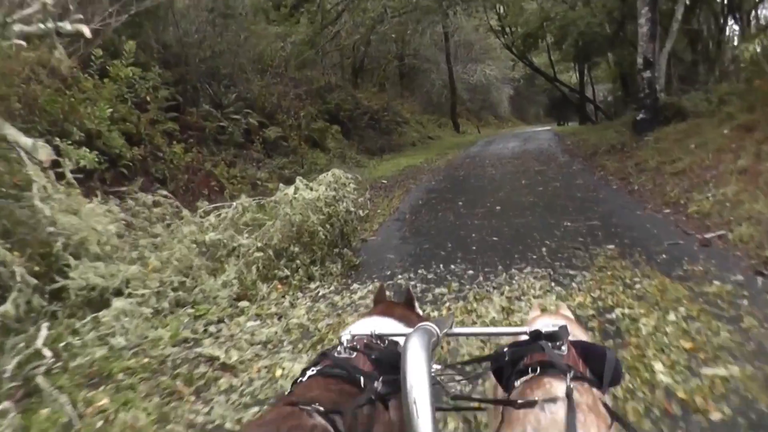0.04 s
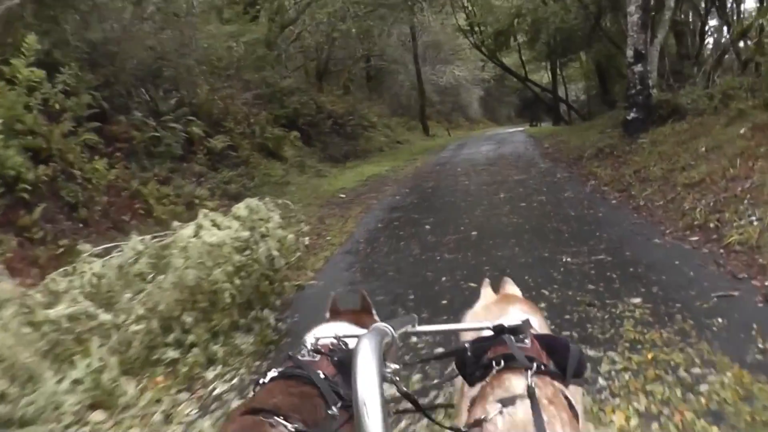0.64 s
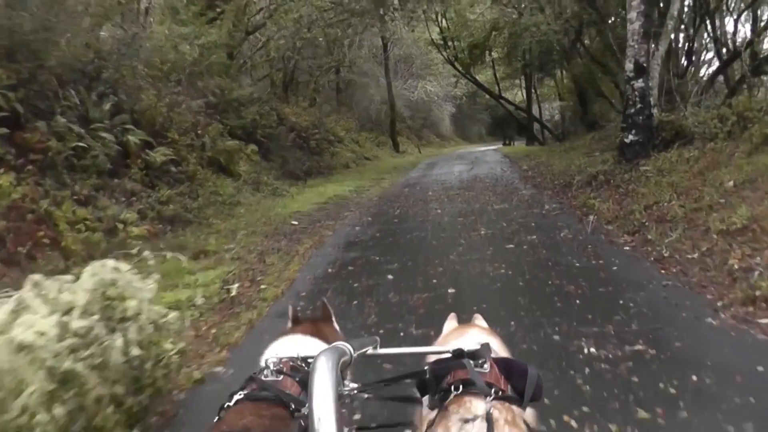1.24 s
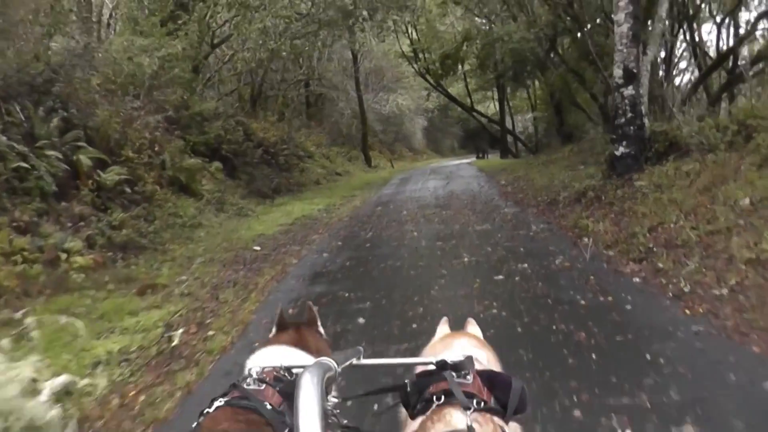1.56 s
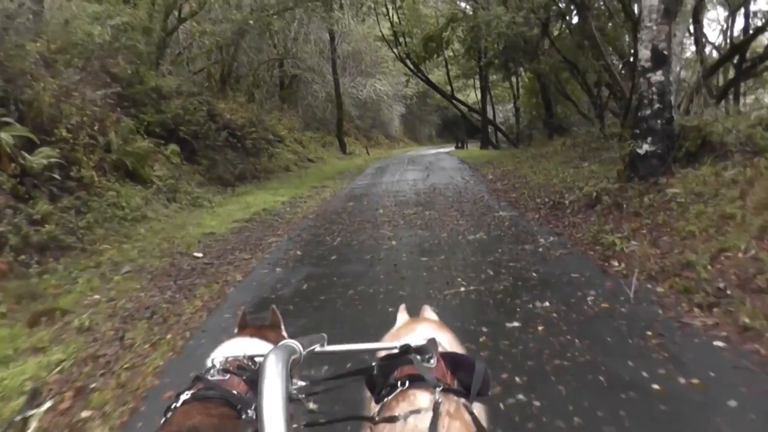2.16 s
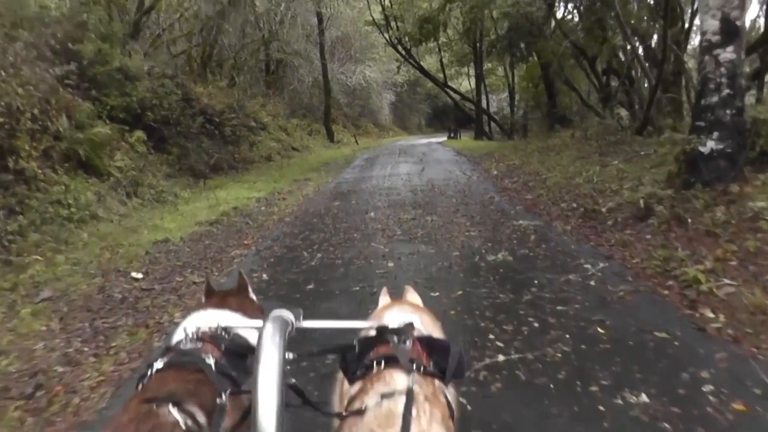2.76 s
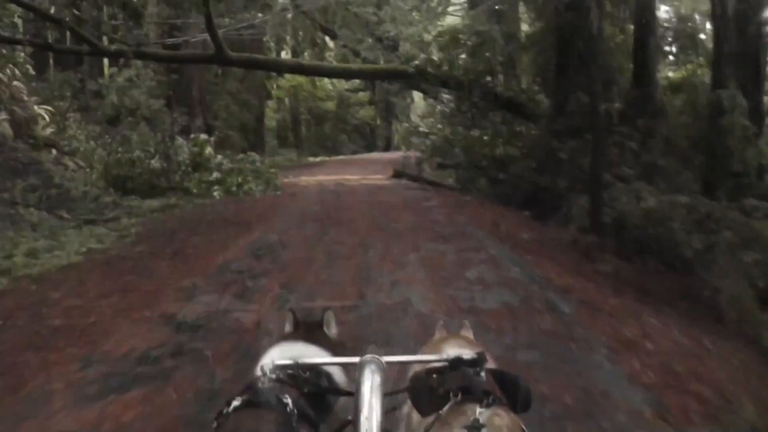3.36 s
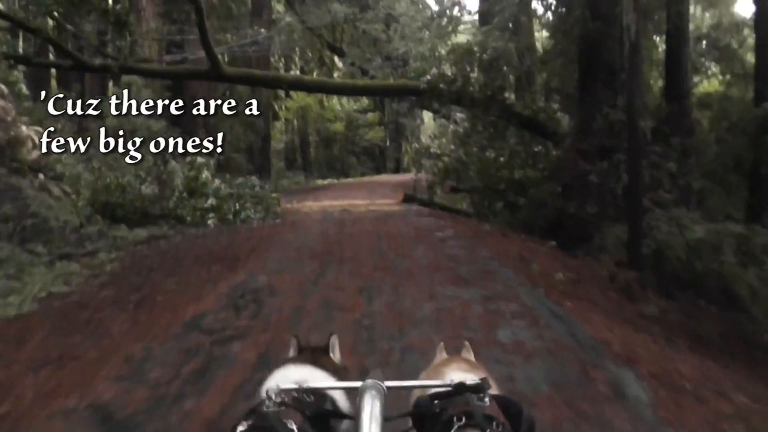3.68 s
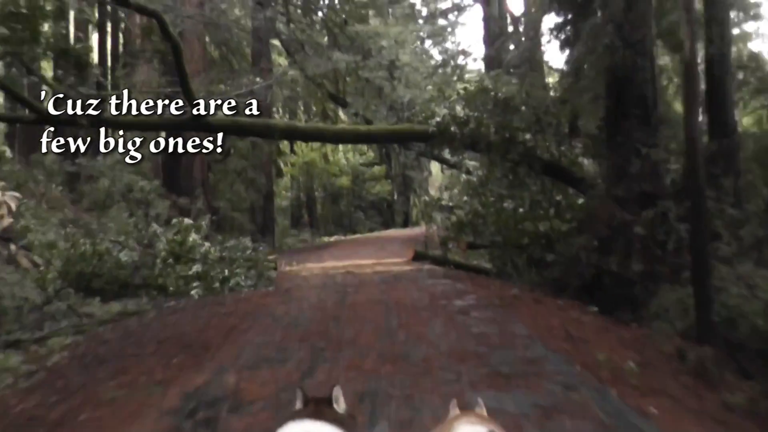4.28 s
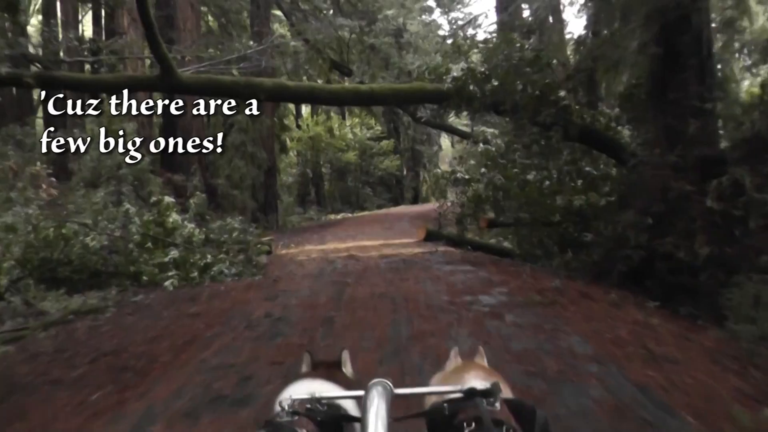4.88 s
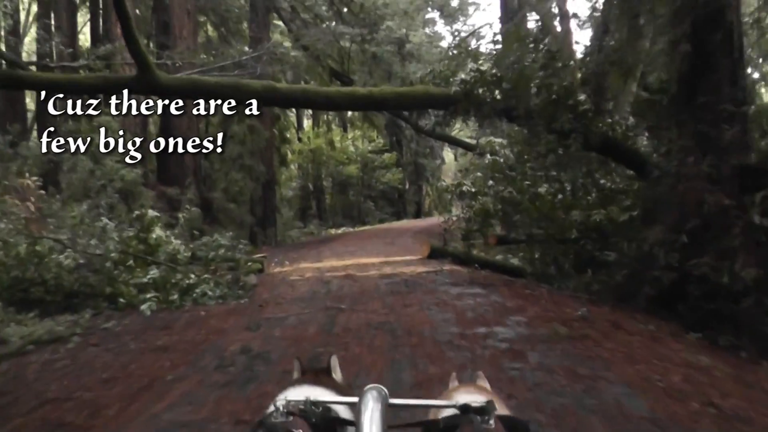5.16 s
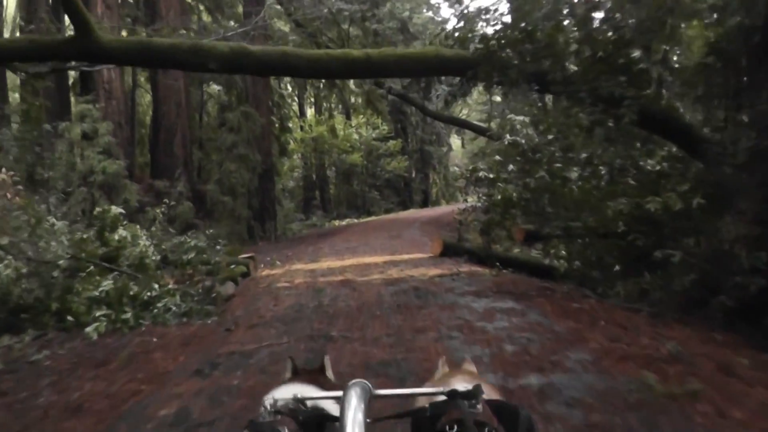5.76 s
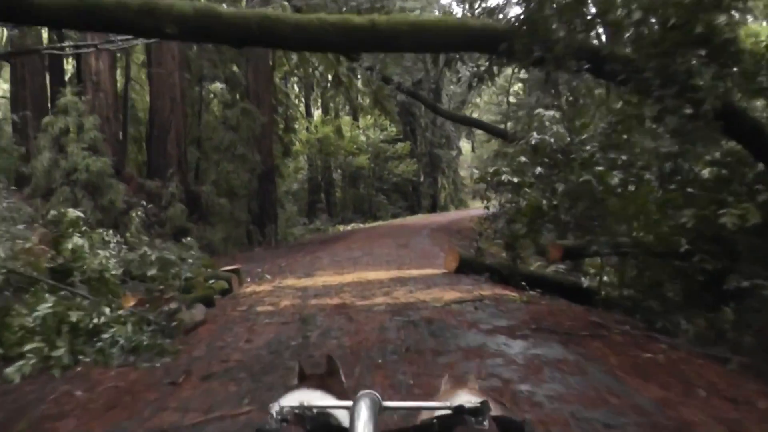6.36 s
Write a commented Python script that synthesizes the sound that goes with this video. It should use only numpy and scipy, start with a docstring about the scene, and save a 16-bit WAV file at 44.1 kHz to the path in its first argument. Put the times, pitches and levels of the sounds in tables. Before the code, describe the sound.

Booming gusts hit a microphone riding on a two-horse carriage, the hardest early on. Beneath them, wheels rumble and crackle through wet forest litter, with crisp leaf crunches, sharp little twig snaps and light, hollow hoofbeats. Then the wind dies away and the crunching thins out, leaving a steady low roll, fine gritty hiss, very soft hoof falls, gentle thuds and an occasional tiny harness clink.

```python
"""A wooded lane, heard from the driver's seat of a two-horse carriage rolling over wet leaves and twigs.
Gusts buffet the microphone while the tyres rumble and crackle, hooves knock, leaves crunch and twigs snap.
Then the wind drops and the wheels run on a soft forest track, with muffled hoof falls and low bumps.
Harness fittings clink faintly now and then. Wind and rumble are shaped noise; litter, hooves and harness
are clusters of tiny contacts that ring resonances."""
import sys
import numpy as np
from scipy import signal
from scipy.fft import rfft, irfft, next_fast_len
from scipy.io import wavfile
from scipy.ndimage import uniform_filter1d, minimum_filter1d

SR = 44100
rng = np.random.default_rng(int(sys.argv[2]) if len(sys.argv) > 2 else 0)


def output_pcm(signal):
    """Save a mono or channel-first signal as 16-bit PCM at the path in sys.argv[1].

    Samples are clipped to [-1, 1] before scaling.
    """
    pcm = np.clip(np.atleast_2d(signal).T, -1, 1) * 32767
    wavfile.write(sys.argv[1], SR, np.round(pcm).astype(np.int16))


N = 283122
TIME = np.arange(N) / SR
SIDE = np.array([[1], [-1]])   # opposite polarity left and right


def from_db(db):
    """Decibels to gain."""
    return 10 ** (np.asarray(db) / 20)


def rms_one(x):
    """Scale to an rms of 1."""
    return x / np.sqrt(np.mean(x ** 2) + 1e-20)


def steady(x, seconds):
    """Even out the level of a noise; rms 1."""
    return x / np.sqrt(np.abs(uniform_filter1d(x ** 2, int(seconds * SR))) + 1e-20)


def in_time(rows):
    """Each column of a curve at every sample."""
    s, *columns = np.transpose(rows)
    return [np.interp(TIME, s, c) for c in columns]


def at_hz(points, hz):
    """Read a table on a log-frequency axis."""
    f, value = np.transpose(points)
    return np.interp(np.log(hz + 1), np.log(f), value)


def add(out, s, sound):
    """Mix a short sound in at time s."""
    i = max(int(s * SR), 0)
    out[i:i + len(sound)] += sound[:max(N - i, 0)]


def drift(hz):
    """A slow random wander with a spread of 1."""
    hop, settle = 40, 2000
    r = np.exp(-2 * np.pi * hz * hop / SR)
    slow = signal.lfilter([1], [1, -2 * r, r * r], rng.standard_normal(N // hop + settle + 2))[settle:]
    return np.interp(np.arange(N) / hop, np.arange(len(slow)), rms_one(slow))


def colour(x, spectrum):
    """Minimum-phase EQ that follows points of (Hz, dB)."""
    size = 2 * next_fast_len(N // 2 + SR // 10)
    cepstrum = irfft(np.log(from_db(at_hz(spectrum, np.arange(size // 2 + 1) * SR / size))))
    cepstrum[1:size // 2] *= 2
    cepstrum[size // 2 + 1:] = 0
    return irfft(rfft(x, size) * np.exp(rfft(cepstrum)))[:N]


def noise(spectrum):
    """Coloured noise, rms 1."""
    return rms_one(colour(rng.standard_normal(N), spectrum))


def resonate(x, hz, width_hz):
    """A resonance with a gain of 1 at its peak."""
    r = np.exp(-np.pi * width_hz / SR)
    feedback = [1, -2 * r * np.cos(2 * np.pi * hz / SR), r * r]
    return signal.lfilter(np.array([1, 0, -1]) * (1 - r * r) / 2, feedback, x + 1e-18)


def fade(t60):
    """A quarter second of exponential decay, falling 60 dB in t60 seconds."""
    return from_db(-60 * TIME[:SR // 4] / t60)


def ring(hz, t60):
    """A struck mode of height 1."""
    return np.sin(2 * np.pi * hz * TIME[:SR // 4]) * fade(t60)


# The headwind bed, dying under the tall trees. Each row: time in seconds, level in dB.
HEADWIND = [(0.0, -21.5), (0.24, -35.5), (0.6, -31.5), (1.5, -26), (2.13, -36), (2.95, -36), (3.22, -33),
            (3.5, -71)]
# Gusts riding on the bed. Each row: start in seconds, length in seconds, level in dB.
GUSTS = [(0.0, 0.01, -36), (0.273, 0.066, -24), (0.45, 0.07, -22.5), (0.603, 0.21, -23), (0.792, 0.12, -18),
         (1.064, 0.19, -25), (1.268, 0.075, -10), (1.663, 0.19, -20.5), (1.89, 0.15, -24.5),
         (2.169, 0.2, -24.5), (2.381, 0.097, -19.5), (2.577, 0.2, -23.5), (2.812, 0.075, -20.5)]


def wind_strength(rise_s=0.015, fall_s=0.036):
    """Each gust swells, holds and dies away on top of the headwind; returns dB."""
    power = from_db(in_time(HEADWIND)[0]) ** 2
    for s, length, db in GUSTS:
        t = np.maximum(TIME - s, 0)
        gust = (1 - np.exp(-t / rise_s)) * np.exp(-np.maximum(t - length, 0) / fall_s)
        power = power + (from_db(db) * gust) ** 2
    return 10 * np.log10(power)


# Tone of the wind pressure both microphone ports share. Each row: frequency in Hz, level in dB.
WIND_MID_EQ = [(15, -19), (30, -11), (55, -9.5), (85, 0), (135, 3.5), (185, 0), (245, -4), (300, -8),
               (500, -18.5), (800, -29.5), (1100, -38.5), (1600, -40), (2400, -108)]
# Tone of the pressure that pushes them opposite ways. Each row: frequency in Hz, level in dB.
WIND_SIDE_EQ = [(15, -50), (30, -36), (60, 1.5), (110, 7), (190, 5.5), (330, 4), (520, 1.5), (850, -10),
                (1400, -20), (1800, -28), (2600, -48)]


def wind(side_db=-3.5, corner_hz=300, lean_left_db=1.2, wander_db=0.5):
    """Turbulence at the ports; stronger gusts shed smaller eddies and so sound brighter."""
    level_db = wind_strength()
    brightness = from_db(np.clip(level_db + 19, -20, 8))
    low_pass = signal.butter(2, corner_hz, fs=SR, output="sos")
    parts = []
    for spectrum in (WIND_MID_EQ, WIND_SIDE_EQ):
        flow = steady(noise(spectrum), seconds=0.044)   # the gust alone sets the strength
        large_eddies = signal.sosfiltfilt(low_pass, flow)
        parts.append(from_db(level_db) * (large_eddies + brightness * (flow - large_eddies)))
    mid, side = parts
    balance_db = lean_left_db + wander_db * drift(hz=3.8)
    return (mid + from_db(side_db) * side * SIDE) * from_db(balance_db * SIDE / 2)


# The wheels along the way; the crackle swells where the litter lies deep. Each row: time in seconds, rumble
# level in dB, crackle level in dB.
ROLLING = [(0.0, -48.5, -40), (0.45, -48, -39), (0.7, -48, -37.5), (1.5, -48.5, -36), (1.68, -48, -38.5),
           (2.3, -48.5, -40.5), (3.04, -48.5, -43), (3.48, -50.5, -40.5), (4.33, -50.5, -41),
           (6.42, -50, -42.5)]
# Tone of the tyre rumble. Each row: frequency in Hz, level in dB.
RUMBLE_EQ = [(18, -61), (30, -15), (70, -1), (214, -2.5), (315, -5), (374, 0.5), (412, -10.5), (500, -8),
             (809, -9), (1000, -14.5), (1210, -11.5), (2250, -21), (3000, -18.5), (3900, -51), (6600, -120)]
# Stereo image of the rumble. Each row: frequency in Hz, left-right likeness from 0 (wide) to 1 (mono).
RUMBLE_LIKENESS = [(60, 0.17), (150, 0.87), (380, 0.6), (950, 0.66), (2380, 0.7), (5980, 0.99),
                   (15000, 0.72)]


def wheels(gain_db=8.5, body_hz=385, body_db=-9.0, uneven_db=1.14, lean_right_db=1.0):
    """Tyres rumble on the ground and set the carriage body humming."""
    mid_eq, side_eq = [], []
    for hz, db in RUMBLE_EQ:
        likeness = np.clip(at_hz(RUMBLE_LIKENESS, hz), 0, .98)
        mid_eq.append((hz, db + 10 * np.log10((1 + likeness) / 2)))
        side_eq.append((hz, db + 10 * np.log10((1 - likeness) / 2)))
    mid = colour(rng.standard_normal(N), mid_eq)
    side = colour(rng.standard_normal(N), side_eq)
    rumble = (mid + side * SIDE) / np.std(mid)
    body = steady(resonate(rng.standard_normal(N), body_hz, width_hz=45), seconds=0.028)
    load_db = uneven_db * drift(hz=17.7)   # the load on the tyres wavers with the uneven track
    level_db = in_time(ROLLING)[0] + gain_db + load_db
    return from_db(level_db - lean_right_db * SIDE / 2) * (rumble + from_db(body_db) * body)


def grains(per_s, spread_db, sharpness, bands=14):
    """Tiny fractures at random times and of random sizes, each ringing briefly in one of the bands."""
    sizes = from_db(spread_db * np.minimum(rng.exponential(1, N), 4.5)) * rng.choice([-1, 1], N)
    clicks = sizes * (rng.random(N) < per_s / SR)
    band = rng.integers(0, bands, N)
    pitches = np.linspace(1200, 15000, bands)
    return sum(resonate(clicks * (band == k), hz, 4000 / sharpness) for k, hz in enumerate(pitches))


def crumples(per_s=190, spread_db=5.0, typical_s=0.012, count=1800):
    """Needles and leaf scraps give way in swells of a few milliseconds, each at its own pitch."""
    out = np.zeros(N)
    draws = rng.random((count, 4))
    starts = np.cumsum(-np.log(draws[:, 0])) / per_s
    tearing = rng.laplace(0, 1, (count, SR // 20))
    for s, (_, size, pitch, length), tear in zip(starts, draws, tearing):
        swell = np.hanning(min(int(typical_s * (.5 + length) * SR), len(tear))) ** 2
        hz = 2500 + 12000 * pitch ** 1.3
        db = -spread_db * np.log(size + 0.12)
        add(out, s, from_db(db) * resonate(tear[:len(swell)] * swell, hz, width_hz=1700))
    return out


# Tone of fine grit and needles. Each row: frequency in Hz, level in dB.
GRIT_EQ = [(1060, -26), (1800, -29), (2520, -16.5), (3540, 0), (3880, -4), (4290, 2), (4620, -0.5),
           (7090, 2), (9500, -5.5), (11400, -20), (15100, -25), (16000, -31)]
# Tone of the wet tyre hiss. Each row: frequency in Hz, level in dB.
WET_HISS_EQ = [(1000, -25), (1800, -15), (2500, -20), (3600, -4), (4500, -3.5), (7000, -1.5), (9500, -14.5),
               (11400, -21), (16000, -23)]


def crackle(grit_db=-8.5, crumple_db=-5.0, hiss_db=-5.5, far_db=-19.0):
    """Grit ticks and scraps crumple under the tyres, over a wet hiss that partly comes from all round."""
    grit = rms_one(colour(grains(per_s=2500, spread_db=3.5, sharpness=1.0), GRIT_EQ))
    scraps = rms_one(colour(crumples(), GRIT_EQ))
    near = from_db(grit_db) * grit + from_db(crumple_db) * scraps + from_db(hiss_db) * noise(WET_HISS_EQ)
    far_hiss = noise([(900, -25), (2500, -5), (9000, 1), (12000, -15), (15500, 9)])
    return from_db(in_time(ROLLING)[1]) * (lane(near) + from_db(far_db) * far_hiss * SIDE)


def soft_steps(start_s=3.62, step_s=0.228, jitter_s=0.02, db=-36.5, hz=1150, count=13):
    """Muffled hoof falls on the soft track, at the nearly even pace of the pair: rows of (s, dB, Hz)."""
    return [(start_s + k * step_s + jitter_s * late, db + 1.5 * force, hz * np.exp(0.11 * pitch))
            for k, (late, force, pitch) in enumerate(rng.standard_normal((count, 3)))]


# Hoof falls on the paved lane. Each row: start in seconds, relative level in dB, pitch in Hz.
PAVED_STEPS = [(0.0687, -27, 1650), (0.3002, -25, 1830), (0.4842, -19.5, 1200), (0.6448, -22.5, 1260),
               (0.839, -23, 1080), (1.1887, -21, 1620), (1.4699, -17.5, 1500), (1.5927, -18.5, 1590),
               (1.846, -25.5, 1480), (2.0892, -26, 1440), (2.2918, -22.5, 1430), (2.5382, -23, 1280),
               (2.7467, -19.5, 1320), (3.067, -25, 1920)]


def hooves(gain_db=-4.0, t60=0.032, settle_s=0.0012, scuff_db=7.0, scuff_width_hz=1000):
    """A shoe settles through the litter in a rattle of small contacts that make the hollow hoof ring."""
    out = np.zeros(N)
    attack = 1 - np.exp(-TIME[:SR // 4] / settle_s)
    for s, db, hz in [*PAVED_STEPS, *soft_steps()]:
        contacts = rng.laplace(0, 1, SR // 4) * fade(t60) * attack
        scuff = resonate(resonate(contacts, hz, scuff_width_hz), hz, scuff_width_hz)
        knock = rms_one(resonate(scuff, hz, width_hz=190)) + from_db(scuff_db) * rms_one(scuff)
        add(out, s - .002, from_db(db + gain_db) * knock / np.abs(knock).max())
    return out


# Single eddies that slap the microphone. Each row: start in seconds, level in dB, pitch in Hz.
EDDIES = [(0.1043, -7.5, 208), (0.352, -15.5, 129), (0.846, -8.5, 177), (0.882, -9, 122),
          (1.180, -9.5, 145), (1.337, 3, 116), (1.355, 2, 129), (1.483, -10.5, 117), (1.715, -9, 170),
          (1.928, -12, 113), (2.447, -16, 139), (2.864, -13, 120), (3.099, -18, 93), (3.196, -18, 100)]


def buffets(cycles=1.286, low_cut_hz=65):
    """Each eddy is one short push and pull of pressure; the microphone rolls off its deepest part."""
    out = np.zeros(N)
    for s, db, hz in EDDIES:
        length = int(cycles / hz * SR)
        slap = np.sin(2 * np.pi * hz * TIME[:length]) * signal.windows.tukey(length, .5)
        add(out, s, from_db(db) * slap)
    return signal.sosfilt(signal.butter(2, low_cut_hz, "high", fs=SR, output="sos"), out + 1e-18)


def strewn(per_s, over_crackle_db, spread_db=1.5, low_hz=4500, high_hz=7800, count=60):
    """Loosely spaced litter, louder where it lies deep and the wheels crackle: rows of (s, dB, Hz)."""
    place, size, pitch = rng.random((count, 3)).T
    s = (np.arange(count) + place) / per_s
    db = np.interp(s, TIME, in_time(ROLLING)[1]) + over_crackle_db + spread_db * (2 * size - 1)
    hz = low_hz * (high_hz / low_hz) ** pitch
    return [row for row in zip(s, db, hz) if row[0] < TIME[-1]]


# The bright tone of crushed leaves. Each row: frequency in Hz, level in dB.
LEAF_EQ = [(1300, -17), (2200, -12), (3000, -15.5), (4100, 6.5), (6500, 5), (8000, 3), (10000, -4.5),
           (11500, -17), (13500, -16), (16000, -30)]
# The darker tone of crushed stalks. Each row: frequency in Hz, level in dB.
STALK_EQ = [(600, 16.5), (1100, 9), (1600, 5), (2400, 10), (3400, 13), (5000, -0.5), (8000, -65)]
# Featured crunches under a hoof or wheel. Each row: start in seconds, hold in seconds,
# relative level in dB, stalk trim in dB, leaf pitch in Hz.
CRUNCHES = [(0.182, 0.025, -37.5, -1.5, 6640), (0.24, 0.06, -37.5, -9, 7760),
            (0.291, 0.014, -35, 8.5, 3770), (0.438, 0.025, -40, 7.5, 3000), (0.514, 0.037, -34.5, 0, 6900),
            (0.64, 0.033, -37, -4, 6200), (0.695, 0.043, -35.5, -3, 4700), (0.745, 0.049, -32, -3.5, 6800),
            (0.83, 0.028, -30.5, 1, 4300), (0.928, 0.12, -32.5, -5.5, 6360),
            (1.054, 0.045, -25.5, -5.5, 6850), (1.102, 0.017, -21, -26, 4800),
            (1.155, 0.052, -30.5, 1, 5950), (1.215, 0.037, -31.5, -7.5, 7100),
            (1.264, 0.069, -27, -4, 5600), (1.44, 0.06, -33.5, 0, 4640), (1.522, 0.05, -30.5, -4.5, 6540),
            (1.587, 0.021, -25, -2, 5160), (1.713, 0.029, -37, -3, 9400), (2.025, 0.021, -36.5, 0, 4050),
            (2.08, 0.027, -36, -5, 5400), (2.278, 0.052, -42, 0, 5400), (2.503, 0.049, -43, 0.5, 4570),
            (3.273, 0.02, -37.5, -18, 8100), (3.773, 0.013, -33.5, -18, 6400),
            (4.215, 0.032, -36.5, -7, 7900), (4.299, 0.028, -38.5, -15, 6700),
            (5.099, 0.012, -35.5, -15, 6300), (5.34, 0.032, -38.5, -19, 6560)]


def crunches(stalk_db=-4.0, rise_s=0.0055, fall_s=0.0052, small_hold_s=0.011, small_trim_db=-16):
    """While the weight bears down, a leaf breaks in a dense burst and stalks crack lower and sparser."""
    leaves = rms_one(colour(grains(per_s=4500, spread_db=2.5, sharpness=4.6), LEAF_EQ))
    stalks = rms_one(colour(grains(per_s=4000, spread_db=4.0, sharpness=3.2), STALK_EQ))
    out = np.zeros(N)
    litter = strewn(per_s=2.5, over_crackle_db=-3.5)
    small = [(s, small_hold_s, db, small_trim_db, hz) for s, db, hz in litter]
    for s, hold, db, trim_db, hz in [*CRUNCHES, *small]:
        start = int(s * SR)
        t = TIME[:min(int((hold + .03) * SR), N - start)]
        now = slice(start, start + len(t))
        press = (1 - np.exp(-t / rise_s)) * np.exp(-np.maximum(t - hold, 0) / fall_s)
        leaf = rms_one(press * (leaves[now] + resonate(leaves[now], hz, width_hz=1500)))
        stalk = from_db(stalk_db + trim_db) * rms_one(press * stalks[now])
        add(out, s, from_db(db) * np.sqrt(hold / (hold + 0.025)) * (leaf + stalk))
    return out


# Featured twig snaps. Each row: time in seconds, relative level in dB, pitch in Hz.
TWIGS = [(0.1885, -18, 6540), (0.5897, -14.5, 9000), (0.6141, -10.5, 4840), (0.9413, -12.5, 4220),
         (1.06, -18, 6650), (1.2256, -11, 6700), (1.4466, -14, 4160), (1.7842, -20, 7380),
         (1.8747, -18, 4860), (2.086, -13.5, 5400), (2.2584, -16.5, 4600), (2.2928, -8, 5510),
         (2.3149, -11.5, 5660), (2.5095, -22.5, 4600), (2.817, -21.5, 6470), (3.0664, -24, 4170),
         (3.0941, -16.5, 5430), (3.1183, -20.5, 5260), (3.2269, -18, 4500), (3.7818, -19, 6700),
         (3.8082, -19.5, 5500), (3.9303, -17, 5120), (4.2268, -24, 6820), (4.4151, -17.5, 7060),
         (5.3677, -27, 7200), (5.977, -30, 5310), (6.2592, -23, 6110), (6.325, -24, 5970)]


def snaps(gain_db=-1.0, splinter_db=-19.0, splinter_t60=0.04, strain_s=0.00084):
    """Fibres tear as a twig bends; it gives one sharp crack, then a short tail of splintering."""
    out = np.zeros(N)
    lead = SR // 100
    tearing = np.concatenate([np.exp(-TIME[lead:0:-1] / strain_s), fade(splinter_t60)])
    for s, db, hz in [*TWIGS, *strewn(per_s=2.5, over_crackle_db=10.5)]:
        force = from_db(splinter_db) * tearing * rng.laplace(0, .5, len(tearing))
        force[lead] = 1   # the break itself
        crack = resonate(force, hz, width_hz=1800)
        add(out, s + 0.00062 - lead / SR, from_db(db + gain_db) * crack / np.abs(crack).max())
    return colour(out, [(500, 4.5), (8000, 4.5), (11500, -7), (16000, -7)])


# Harness clinks. Each row: start in seconds, relative levels of the lower and the upper mode in dB.
CLINKS = [(1.738, -27, -45), (2.044, -30.5, -52), (4.132, -60, -40), (5.051, -58, -39), (5.285, -41, -51),
          (5.802, -32.5, -42), (6.355, -62, -53)]


def harness(gain_db=2.0, modes_hz=(9510, 10790), swell_s=0.0045, ring_db=-4.0, tick_db=-17.0):
    """Small steel fittings meet with a tick, chatter for a moment and ring on in two high modes."""
    out = np.zeros(N)
    swell = 1 - np.exp(-TIME[:SR // 4] / swell_s)
    for s, *mode_dbs in CLINKS:
        for hz, db in zip(modes_hz, mode_dbs):
            contacts = rng.laplace(0, 1, SR // 4)
            tick = resonate(contacts * fade(t60=0.008), hz, width_hz=1100)
            chatter = resonate(contacts * fade(t60=0.014) * swell, hz, width_hz=70)
            tail = from_db(ring_db) * swell * ring(hz, t60=0.067)
            clink = from_db(tick_db) * tick / np.abs(tick).max() + chatter / np.abs(chatter).max() + tail
            add(out, s, from_db(db + gain_db) * clink)
    return out


# Bumps in the track. Each row: start in seconds, relative level in dB, pitch in Hz.
BUMPS = [(3.601, -32, 162), (4.085, -32, 376), (4.552, -28, 156), (5.14, -32, 195), (6.069, -26.5, 377)]


def bumps(gain_db=-2.5):
    """The carriage answers a bump with a soft, low thud."""
    out = np.zeros(N)
    attack = 1 - fade(t60=0.037)
    for s, db, hz in BUMPS:
        add(out, s, from_db(db + gain_db) * ring(hz, t60=0.096) * attack)
    return out


# Tone of the reflections from the sides. Each row: frequency in Hz, gain in dB.
SCATTER_EQ = [(800, 1), (1800, -10), (2800, -11.5), (4200, -13.5), (6400, -21.5), (9800, -6.5),
              (12500, -10.5), (15000, -23)]


def lane(x, lean_db=0.76):
    """Ground sounds arrive from slightly right of centre; carriage and banks scatter them sideways."""
    echoes = rng.standard_normal(SR // 4) * fade(t60=0.017)
    side = colour(signal.fftconvolve(x, echoes / np.linalg.norm(echoes))[:N], SCATTER_EQ)
    return x * from_db(-lean_db * SIDE) + side * SIDE


def scene():
    """The mix: spot sounds placed in the lane, over beds of wheels and wind."""
    spots = crunches() + snaps() + hooves() + bumps() + harness()
    return lane(spots) + crackle() + wheels() + wind() + buffets()


def record(dry, ceiling_db=-4.0, hold_s=0.056, release_db_per_s=220, cutoff_hz=15900):
    """A limiter ducks the mix on the hardest gust, holds and recovers; a low-pass trims the top."""
    over_db = np.maximum(20 * np.log10(np.abs(dry).max(axis=0) + 1e-9) - ceiling_db, 0)
    hold = 2 * int(hold_s * SR / 2) + 1
    held_db = -minimum_filter1d(-over_db, hold, origin=hold // 2)
    duck_db = np.maximum.accumulate(held_db + release_db_per_s * TIME) - release_db_per_s * TIME
    limited = dry * from_db(-uniform_filter1d(duck_db, size=64))
    return signal.sosfilt(signal.ellip(10, .1, 80, cutoff_hz, fs=SR, output="sos"), limited)


dry = scene()
out = record(dry)
output_pcm(out)
```